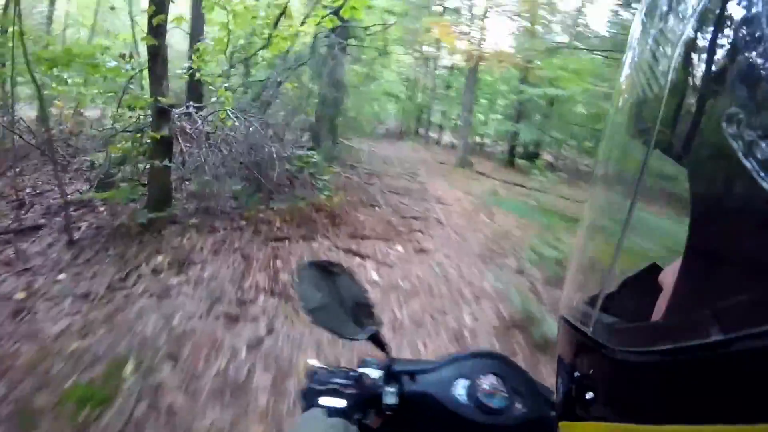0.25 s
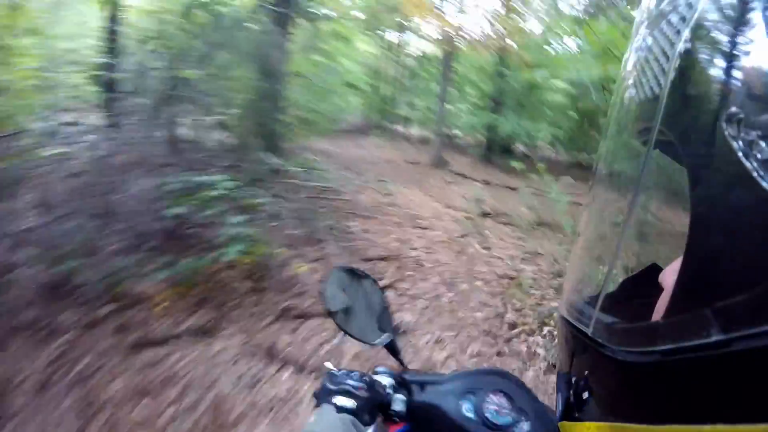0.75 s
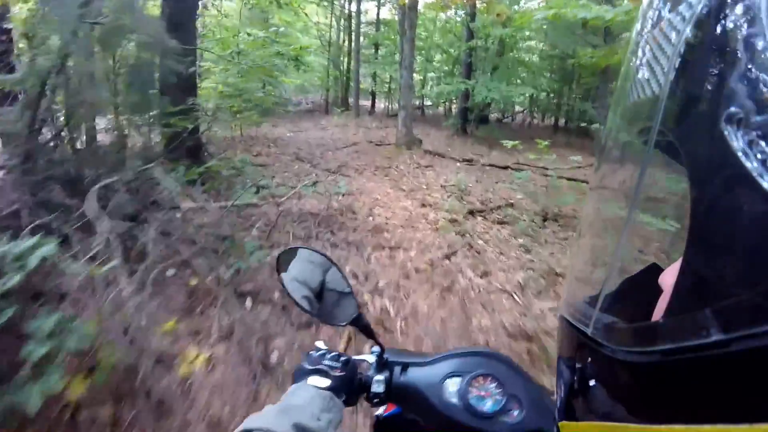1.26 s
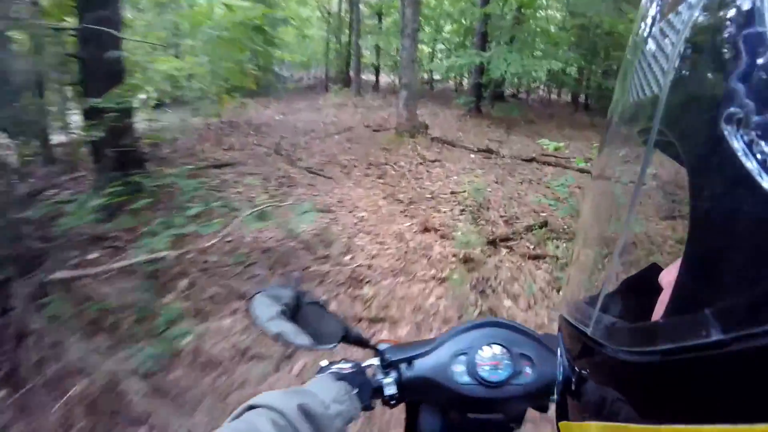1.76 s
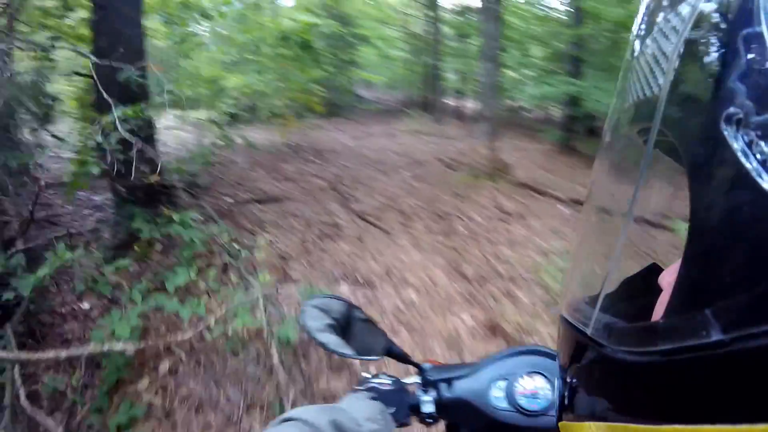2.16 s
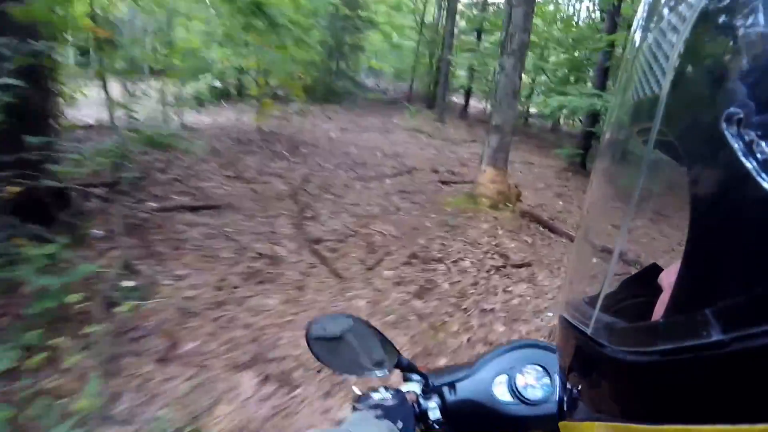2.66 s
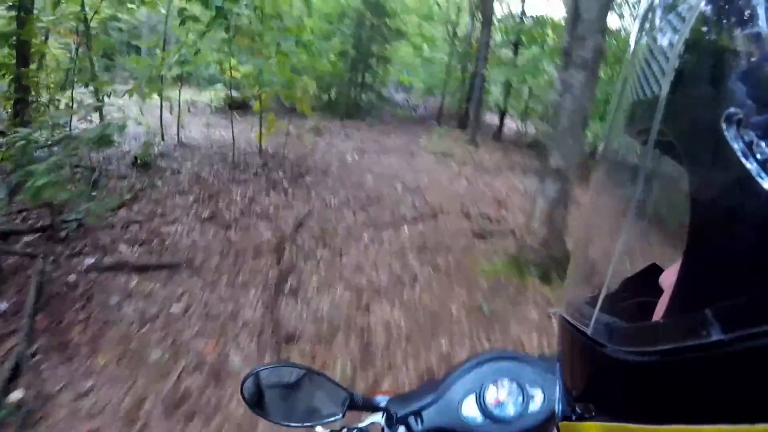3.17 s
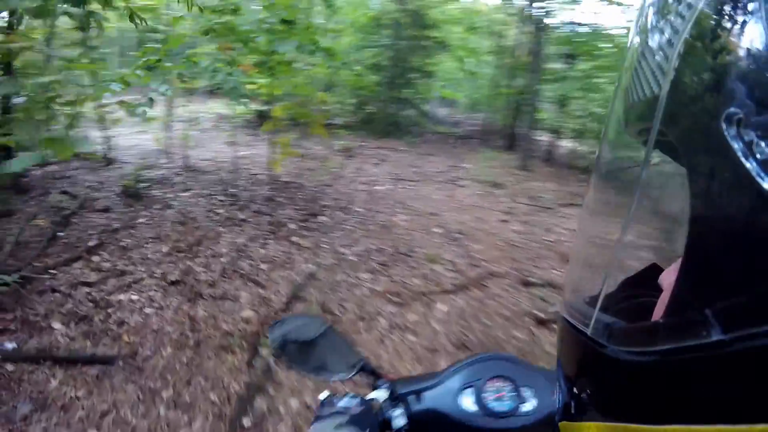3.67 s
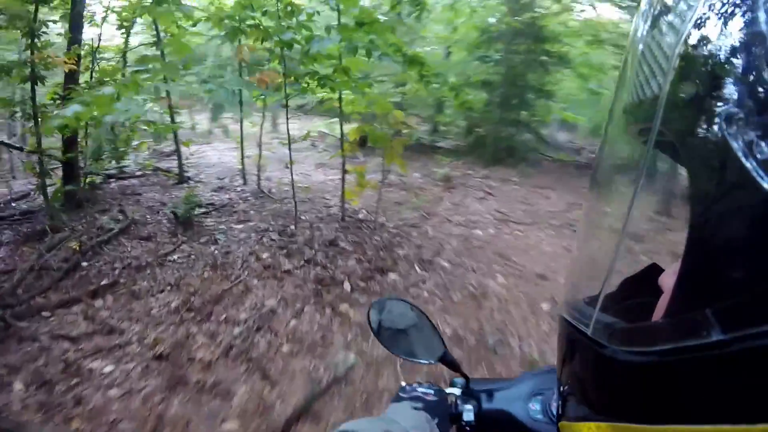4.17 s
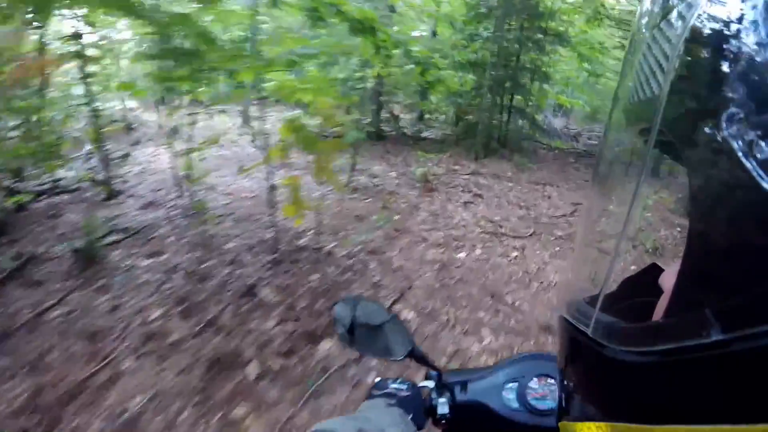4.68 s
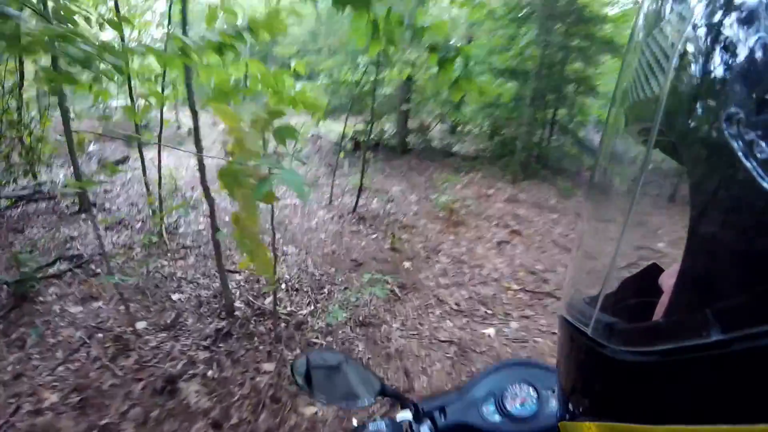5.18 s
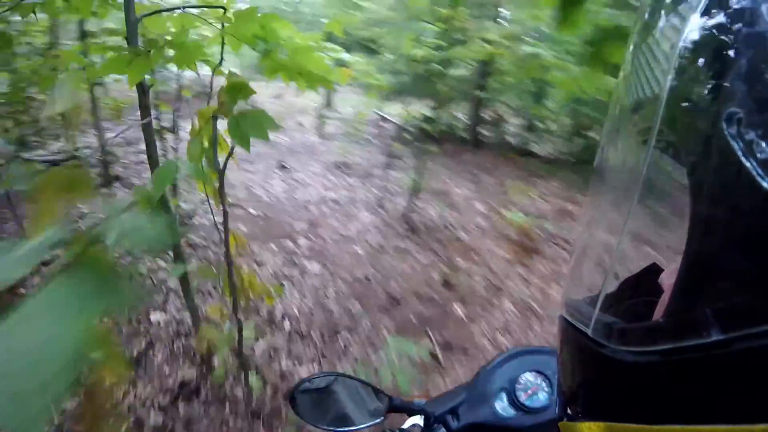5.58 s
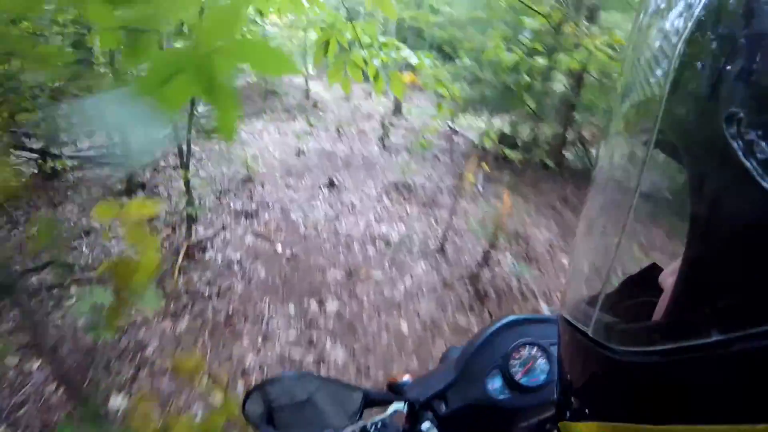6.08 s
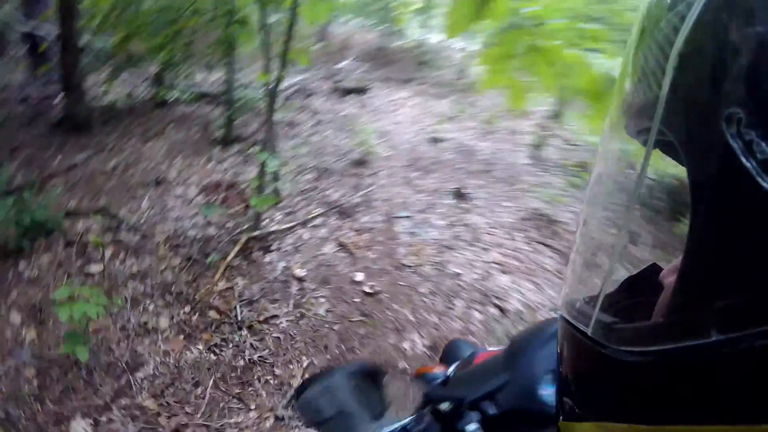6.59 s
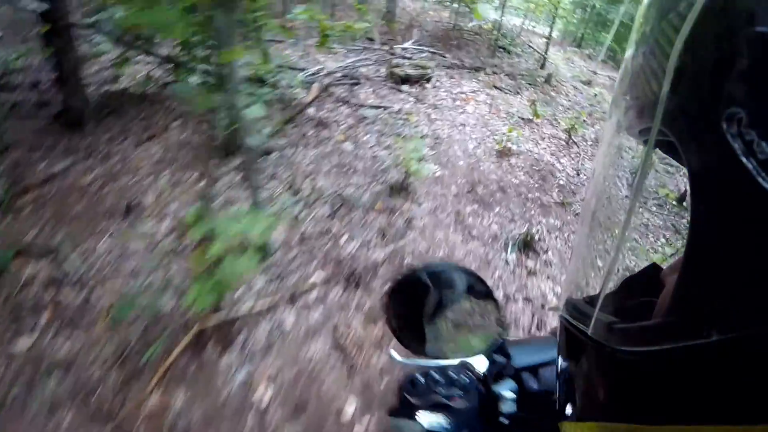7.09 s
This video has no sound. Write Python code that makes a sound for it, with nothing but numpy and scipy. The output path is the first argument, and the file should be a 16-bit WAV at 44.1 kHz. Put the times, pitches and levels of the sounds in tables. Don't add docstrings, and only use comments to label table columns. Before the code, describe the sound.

Muffled, boxy scooter putter heard from the rider's helmet, surging under throttle, popping when it closes, while panels rattle and leaves brush past.

```python
import sys
import numpy as np
from scipy import signal
from scipy.fft import rfft, irfft, next_fast_len
from scipy.io import wavfile
from scipy.ndimage import uniform_filter1d

SR = 44100
rng = np.random.default_rng(int(sys.argv[2]) if len(sys.argv) > 2 else 0)


def waveform_to_disk(signal):
    frames = np.transpose(np.atleast_2d(signal))
    scaled = np.clip(frames, -1, 1) * 32767
    samples = np.round(scaled).astype(np.int16)
    wavfile.write(sys.argv[1], SR, samples)


def magnitude_from_level(level_db):
    exponent = np.asarray(level_db, float) / 20
    return 10 ** exponent


N = 323694


def curves(table):
    s, *columns = np.transpose(table)
    return [np.interp(np.arange(N) / SR, s, c) for c in columns]


def unit(x):
    return x / np.sqrt(np.mean(x ** 2))


def noise():
    return rng.standard_normal(N)


def ring(x, hz, width_hz):
    return signal.lfilter(*signal.iirpeak(hz, hz / width_hz, fs=SR), x)


def ring_twice(x, hz, width_hz):
    return ring(ring(x, hz, width_hz), hz, width_hz)


def colour(x, points):
    hz, db = np.transpose(points)
    n = next_fast_len(len(x), True)
    f = np.fft.rfftfreq(n, 1 / SR) + 1
    gain = magnitude_from_level(np.interp(np.log(f), np.log(hz), db))
    return irfft(rfft(x, n) * gain, n)[:len(x)]


def walk(rate):
    k = int(SR / rate)
    steps = np.repeat(rng.standard_normal(N // 100), k)[:N]
    return unit(uniform_filter1d(uniform_filter1d(steps, k), k))


def controls():
    # t/s, firing rate/Hz
    speed = [(0.0, 33.34), (0.22, 33.66), (1.0, 30.63), (1.49, 38.9), (1.9, 31.79), (2.39, 36.51),
             (2.68, 30.96), (3.11, 40.26), (3.39, 42.96), (3.82, 44.51), (4.15, 30.6), (4.56, 25.2),
             (5.4, 25.98), (5.78, 35.96), (5.93, 38.91), (6.48, 42.6), (6.91, 44.04), (7.34, 37.6)]
    # t/s, throttle (0-1)
    grip = [(0, 0.11), (.75, 0.52), (1.3, 0.71), (1.52, 0.74), (1.6, 0.5), (1.92, .1), (2.05, 0.6),
            (2.42, 0.69), (2.55, 0.27), (2.69, 0.38), (2.74, 0.74), (3.84, 0.78), (3.93, 0.53), (4.6, 0.09),
            (5.4, 0.13), (5.72, 0.72), (7.2, 0.79), (7.3, 0.46)]
    # t/s, roughness/dB
    trail = [(0, 2.2), (.4, 1), (.72, 1.5), (.9, -0.5), (1.2, 1.5), (1.6, 0), (2.05, -1), (2.47, 0.4),
             (2.6, -2), (3.0, -0.3), (3.6, -1), (4.2, -1.3), (4.42, 0), (4.6, -1), (5.3, -1), (5.6, -0.45),
             (6.3, -0.5), (7.34, 2.1)]
    (hz,), (throttle,), (ground_db,) = curves(speed), curves(grip), curves(trail)
    flywheel_s, idle_hz, full_hz = 0.14, 25, 44
    hz = uniform_filter1d(hz, size=int(flywheel_s * SR))
    revs = np.clip((hz - idle_hz) / (full_hz - idle_hz), 0, 1.1)
    return hz, np.clip(throttle, 0, 1), revs, ground_db


def rule(law, throttle, revs, ground_db, steep):
    closed_db, open_db, revs_db, share = law
    return closed_db + open_db * throttle + revs_db * revs ** steep + share * ground_db


def engine(hz, state):
    # multiple of firing rate, open-throttle level/dB, closed-throttle level/dB
    upper_orders = [(4, -8.5, 0), (5, -10.5, 0.3), (6, -7.5, -17), (7, 6.5, -29.5), (8, -3.5, -25),
                    (9, -1.5, -35.5), (10, -10, -25)]
    # share of the cycle, level/dB
    strokes = [(.31, 0), (.75, -1)]
    intake_db = rule((-34, 20.5, 0.5, -0.5), *state, steep=3.3)
    crank_db = rule((-29, 6.5, -2.5, 0.37), *state, steep=3.3)
    third_db = rule((-39, 8, 6.5, 1), *state, steep=3.3)
    uneven_db = rule((4.5, -1, -1.24, 1.7), *state, steep=3.3)
    upper_db = rule((-37.5, 7.5, 0.5, 0), *state, steep=4.5)
    start_turn, jitter = .13, .004
    turns = start_turn + np.cumsum(hz) / SR + jitter * walk(14)
    load = uniform_filter1d(state[0], size=4000)
    lean = .9 - 1.45 * load
    lead = 1.25 * load
    orders = [(1, intake_db), (2, crank_db), (3, third_db)]
    for k, on_db, off_db in upper_orders:
        orders.append((k, upper_db + load * on_db + (1 - load) * off_db))
    chance = np.tanh(rng.standard_normal((1000, 4))).T
    strength = chance[:2, np.floor(turns + .5).astype(int)]
    intake, exhaust = uniform_filter1d(strength, size=300) * np.clip(uneven_db, 0, 3)
    wave = 0
    for k, db in orders:
        angle = 2 * np.pi * k * turns + lean + (k > 2) * lead
        wave = wave + magnitude_from_level(db + (intake if k < 3 else exhaust)) * np.sqrt(2) * np.cos(angle)
    blows = 0
    for (share, db), scatter in zip(strokes, chance[2:]):
        cycle = np.floor(turns + 1 - share).astype(int)
        blows = blows + np.diff(cycle, prepend=cycle[0]) * magnitude_from_level(db + 1.5 * scatter[cycle])
    return wave, turns, blows, load


def whine(turns, state):
    # multiple of firing rate, level/dB
    tones = [(13, -3), (14, -2), (16, 0), (17, -7), (18, -2)]
    lines = sum(magnitude_from_level(db + 4.5 * walk(5)) * np.cos(2 * np.pi * k * turns) for k, db in tones)
    return magnitude_from_level(rule((-64, 13, 15, .1), *state, steep=3)) * np.sqrt(2) * lines


def shell(modes, blows, phase, load, struck_db, gate):
    struck, shaken = 0, 0
    swell = 1 + gate * np.cos(2 * np.pi * (phase - .1))
    for k, (hz, width, blow_db, shake_db) in enumerate(modes):
        struck = struck + (-1) ** k * magnitude_from_level(blow_db) * unit(ring_twice(blows, hz, 1.2 * width))
        shaken = shaken + magnitude_from_level(shake_db + 2.0 * walk(18)) * ring(swell * noise(), hz, width)
    share = magnitude_from_level(struck_db) * load ** 2.0
    return (share * unit(struck) + unit(shaken)) / np.sqrt(1 + share ** 2)


def crankcase(blows, phase, load, state):
    # f/Hz, width/Hz, struck by firings level/dB, shaken by trail level/dB
    case_modes = [(275, 25, -20.5, -2), (379.4, 116, 6.5, -9), (419, 150, -2.5, -5), (545.4, 65, 3.5, -5.5),
                  (690.3, 130, 3, -9.5)]
    level_db = rule((-38, 12.5, 4, 0.23), *state, steep=10.5)
    return magnitude_from_level(level_db) * shell(case_modes, blows, phase, load, struck_db=8.5, gate=.3)


def panels(blows, phase, load, state):
    # f/Hz, width/Hz, struck by firings level/dB, shaken by trail level/dB
    panel_modes = [(790, 35.4, 6, 7.5), (875, 66.5, -35, 6.7), (997, 76, 4, 6)]
    level_db = rule((-34, 4, 5, 0.36), *state, steep=7.3)
    return magnitude_from_level(level_db) * shell(panel_modes, blows, phase, load, struck_db=-2, gate=.2)


def valves(phase):
    tick = np.exp(-((phase - .3) % 1) / .07) * noise()
    bright = unit(ring_twice(tick, 5400, 1200))
    dull = unit(ring(ring(tick, 3419, 800), 3680, 520))
    return magnitude_from_level(-62.5) * (bright + 0.72 * dull)


def grit():
    taps_per_s = 45
    strength_db = 2.87 * np.minimum(rng.exponential(size=N), 3.1)
    taps = (rng.random(N) < taps_per_s / SR) * magnitude_from_level(strength_db)
    return magnitude_from_level(-45) * unit(ring(taps, 830, 190) + ring(taps, 380, 78) + 1.3 * ring(taps, 330, 200))


def rumble(state):
    bumps = unit(ring(noise(), 14.0, 6.7)) + 0.58 * unit(ring(ring(noise(), 80, 150.0), 80, 82))
    return magnitude_from_level(rule((-26, -8, -15.5, 3.5), *state, steep=4.7)) * bumps


def rustle(state):
    # f/Hz, level per Hz/dB
    hiss_tone = [(1150, -35), (1400, 3.5), (1750, -5.5), (2600, -0.5), (3000, -7), (3660, -2), (4500, -8),
                 (5800, -2.5), (6900, -7.5), (7600, -9.5), (9000, -13.5)]
    hiss = unit(colour(noise(), hiss_tone))
    low = signal.sosfiltfilt(signal.butter(2, 4500, fs=SR, output="sos"), hiss)
    flicker = magnitude_from_level(.9 * walk(20)) * low + magnitude_from_level(.9 * walk(20)) * (hiss - low)
    air_tone = [(6000, -28), (7500, -2), (9000, -5), (10500, -2.5), (12800, -7.5), (13300, -30)]
    air = unit(colour(noise(), air_tone))
    return magnitude_from_level(rule((-52, 0, 5.5, 1.38), *state, steep=1.7)) * flicker + magnitude_from_level(-62.5) * air


def knocks():
    # t/s, peak level/dB, f/Hz, time to fall 60 dB/s
    bumps = [(0.16, -6.5, 410, 0.065), (0.446, -1.5, 381, 0.065), (0.527, -7.5, 321, 0.067),
             (0.549, -19.5, 395, 0.23), (0.892, -6, 369, 0.1), (1.026, -19, 374, 0.23),
             (1.749, -10, 336, 0.075), (1.976, -4.5, 1005, 0.058), (2.083, -9, 361, 0.12),
             (2.187, -14.5, 366, 0.23), (2.454, -6, 401.2, 0.053), (2.701, -14, 344.1, 0.18),
             (4.017, -4.5, 351.6, 0.07), (4.426, -11, 376, 0.09), (5.309, -9.5, 371, 0.077),
             (5.503, -5.5, 349, 0.066), (5.549, -9.5, 256.4, 0.14), (5.581, -32, 276, 0.078),
             (7.112, -7.5, 721, 0.077)]
    out, t = np.zeros(N + SR), np.arange(SR // 6) / SR
    for s, db, hz, t60 in bumps:
        fade = np.exp(-np.log(1000) * t / t60) * (1 - np.exp(-t / 0.011))
        out[int(s * SR):][:len(t)] += magnitude_from_level(db - 4.0) * np.sin(2 * np.pi * hz * t) * fade
    return out[:N]


def snaps():
    # t/s, peak level/dB, centre f/Hz, rise time/s
    twigs = [
        (0.3507, -37, 2610, 0.002),
        (0.356, -38.5, 5330, 0.007),
        (0.4529, -34, 2160, 0.0041),
        (4.3999, -50, 2372, 0.0015),
        (5.8142, -42, 2142, 0.0057),
        (6.959, -29.5, 2790, 0.0037),
        (6.9672, -35, 3400, 0.0035),
    ]
    # t/s, peak level/dB, centre f/Hz, rise time/s
    brushes = [
        (0.69, -41.5, 6025, 0.028),
        (1.9674, -29.5, 6020, 0.013),
        (5.144, -41, 8190, 0.016),
        (6.6536, -32.5, 5697, 0.0088),
    ]
    # t/s, peak level/dB, centre f/Hz, rise time/s
    stick = [
        (2.967, -28, 2336, 0.0014),
    ]
    out, t = np.zeros(N + SR), np.arange(SR // 8) / SR
    for s, db, hz, rise in twigs + brushes + stick:
        crackle = rng.standard_normal(len(t))
        sparkle = .25 if 1e-3 < rise < 4e-3 else .5
        burst = unit(ring(crackle, hz, 1200)) + sparkle * unit(ring_twice(crackle, 1.5 * hz, 2.5 * hz))
        age = t / max(rise, .0002)
        out[int(s * SR):][:len(t)] += magnitude_from_level(db - 8.5) * burst * age * np.exp(1 - age)
    return signal.sosfilt(signal.butter(4, 12500, fs=SR, output="sos"), out[:N])


def cracks():
    # t/s, peak level/dB
    hits = [(0.528, -15), (0.774, -15), (0.854, -3.5), (0.931, -14), (1.664, -35), (1.977, -9.5),
            (2.757, -5), (3.034, -11), (3.811, -19), (3.986, -15), (4.182, -26), (4.36, -35), (4.432, -9),
            (5.152, -12.5), (5.25, -22), (5.665, -8), (5.816, -13), (5.863, -26), (5.947, -15), (7.116, -6)]
    out, t = np.zeros(N + SR), np.arange(SR // 6) / SR
    for s, db in hits:
        crack = ring(rng.standard_normal(len(t)), 770, 900) * (t / .0025) * np.exp(1 - t / .0025)
        out[int(s * SR):][:len(t)] += magnitude_from_level(db - 1.5) * crack / np.abs(crack).max()
    return out[:N]


def pops(turns):
    # start t/s, end t/s, peak level/dB, one firing in how many
    overruns = [
        (1.62, 1.84, -13.5, 1),
        (2.43, 2.56, -21, 1),
        (3.902, 4.16, -12, 1),
        (4.195, 4.45, -11, 2),
    ]
    pop_hz, scatter = 92, 2.5 * np.tanh(rng.standard_normal(1000))
    out, t = np.zeros(N + SR), np.arange(SR // 20) / SR
    pop = np.sin(2 * np.pi * pop_hz * t) * (t / 0.0039) ** 1.265 * np.exp(1 - t / 0.0071)
    for start, end, db, every in overruns:
        first, last = int(turns[int(start * SR)]) + 1, int(turns[int(end * SR)]) + 1
        for turn in range(first, last, round(every)):
            begin = np.searchsorted(turns, turn) - int(.75 * SR / pop_hz)
            out[begin:][:len(t)] -= magnitude_from_level(db - 12 + scatter[turn]) * pop
    return out[:N]


def housing(low, shells):
    muffled = signal.sosfiltfilt(signal.butter(5, 1130, fs=SR, output="sos"), low)
    return muffled + magnitude_from_level(-7) * ring(shells, 1477, 310) + magnitude_from_level(-10.5) * ring_twice(shells, 1850, 590)


def two_capsules(mid):
    # f/Hz, side minus mid level/dB
    side_tone = [(60, -80), (110, -75), (200, -39), (370, -38), (680, -27), (1250, -21), (2300, -23.5),
                 (4220, -26.5), (7750, -26.5), (14200, -59)]
    air_tone = [(2000, -87), (6000, -19), (8500, -16.0), (13000, 0.5)]
    side = -colour(mid, side_tone) + magnitude_from_level(-5) * colour(np.roll(mid, 900), side_tone)
    side = side + magnitude_from_level(-17) * colour(np.roll(mid, 2100), air_tone)
    return np.array([mid + side, mid - side])


def scene():
    hz, *state = controls()
    wave, turns, blows, load = engine(hz, state)
    phase = turns % 1
    shells = crankcase(blows, phase, load, state) + panels(blows, phase, load, state)
    low = wave + whine(turns, state) + shells + grit() + rumble(state) + knocks() + cracks() + pops(turns)
    return two_capsules(housing(low, shells) + valves(phase) + rustle(state) + snaps())


def starve(x, floor_db, follow, swing_db, top_db):
    frame = dict(window="cosine", nperseg=1880, noverlap=940)
    z = signal.stft(x, **frame)[2]
    power = np.abs(z[:, 1:]) ** 2
    frames = z.shape[2]
    loud_db = 10 * np.log10(power.sum(axis=(0, 1)) + 1e-9)
    line = np.arange(940)[:, None]
    top = line > 310
    shortage = uniform_filter1d(rng.standard_normal(frames), size=2)
    shortage = np.tanh(unit(shortage - uniform_filter1d(shortage, size=9)))
    own_db = np.repeat(3.2 * rng.standard_normal((47, frames)), 20, axis=0)
    limit_db = floor_db + follow * np.clip(loud_db - loud_db.mean(), -7, 7) + own_db
    limit_db = limit_db + shortage * np.where(top, 9, swing_db) + top_db * top + 9 * (line > 560)
    limit = magnitude_from_level(limit_db) ** 2
    bands = np.repeat(power.reshape(2, -1, 20, frames).mean(axis=2), 20, axis=1)
    line_limit = np.where(top, np.clip(2.5 * bands, 3 * limit, 12 * limit), .6 * limit)
    z[:, 1:] *= (bands > limit) & (power > line_limit)
    return signal.istft(z, **frame)[1][:, :N]


def roll_off(x):
    return signal.sosfilt(signal.butter(12, 14840, fs=SR, output="sos"), x)


def record(dry):
    steady = signal.sosfilt(signal.butter(1, 6.0, "high", fs=SR, output="sos"), dry)
    thin = starve(steady, floor_db=-86.5, follow=1.4, swing_db=5.5, top_db=3)
    return roll_off(thin)


dry = scene()
out = record(dry)
waveform_to_disk(out)
```